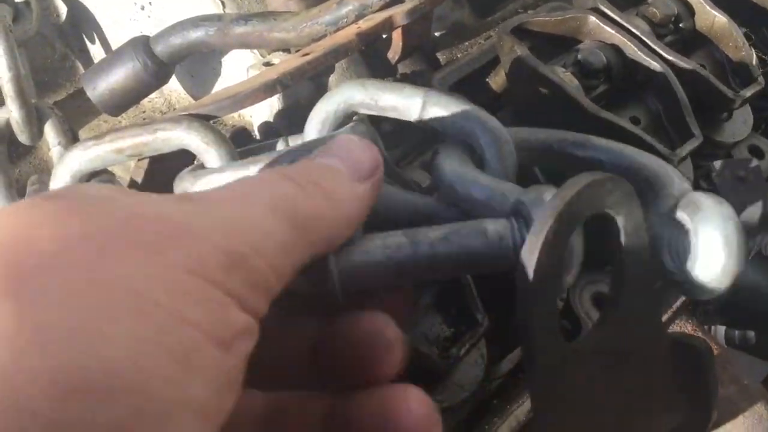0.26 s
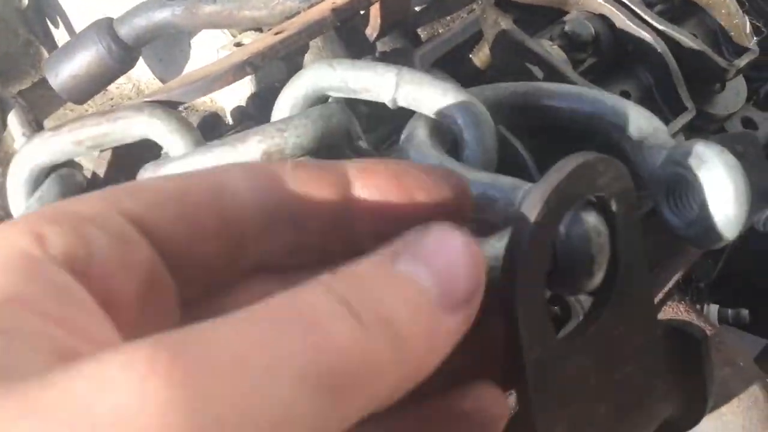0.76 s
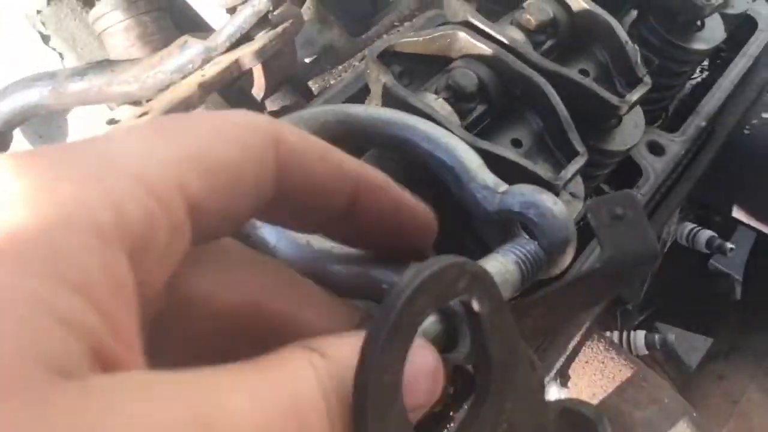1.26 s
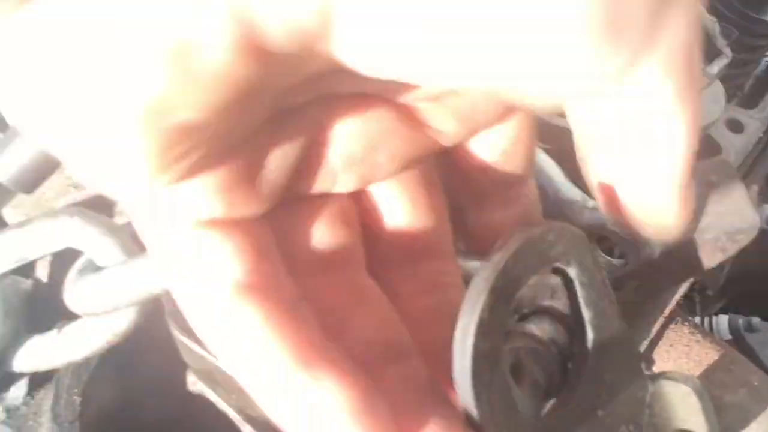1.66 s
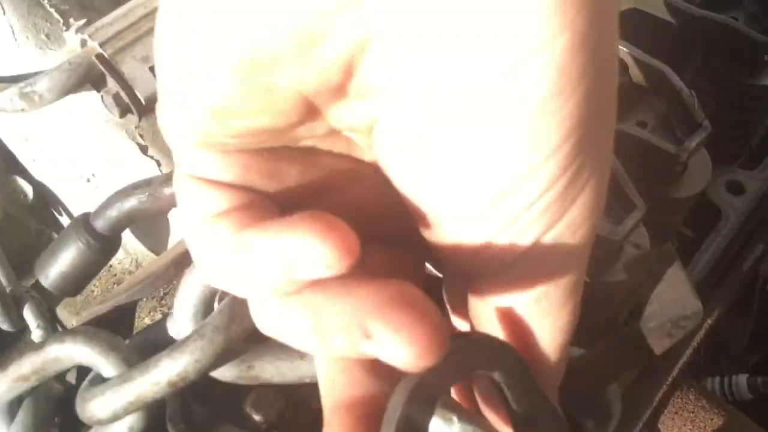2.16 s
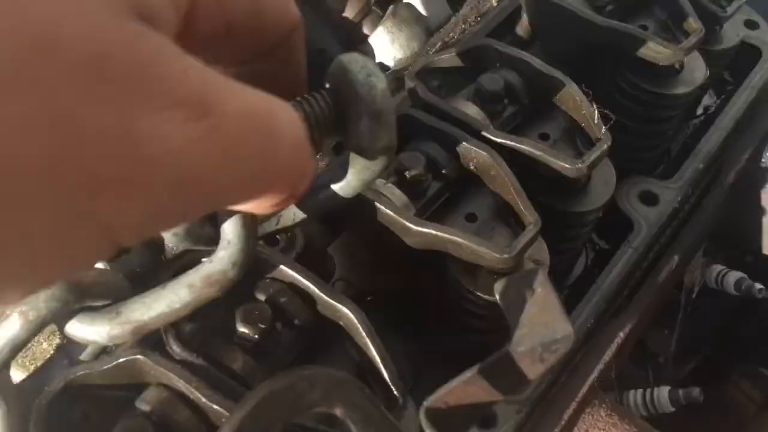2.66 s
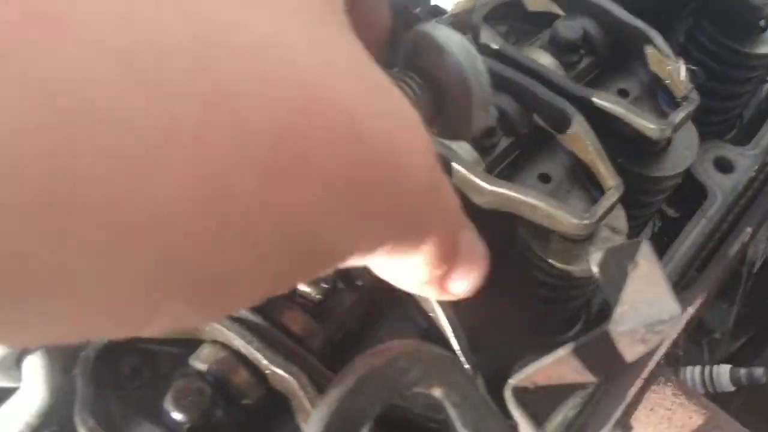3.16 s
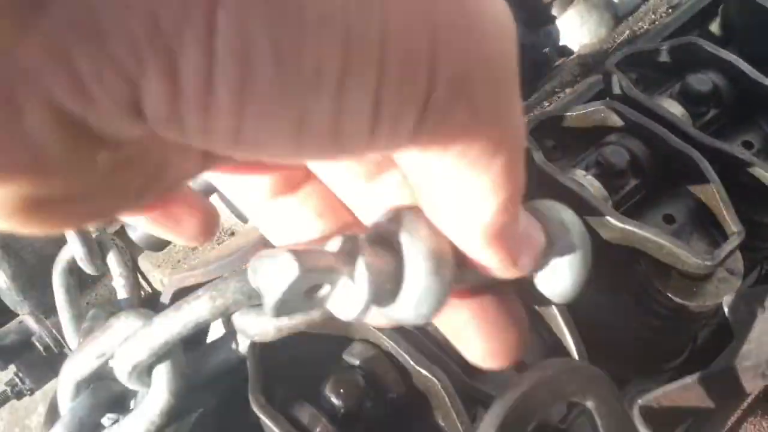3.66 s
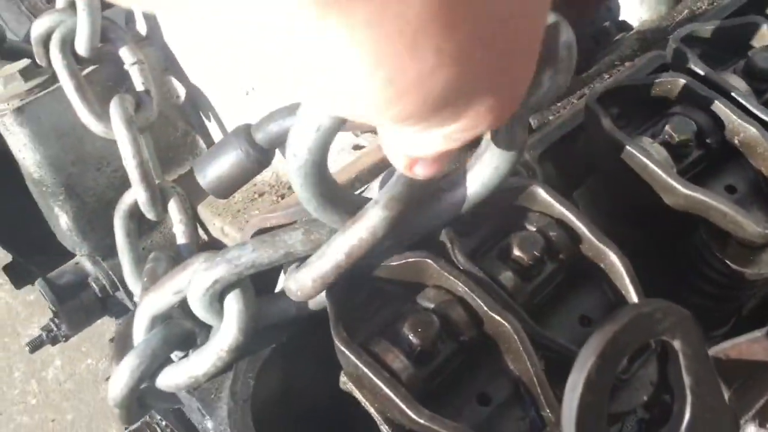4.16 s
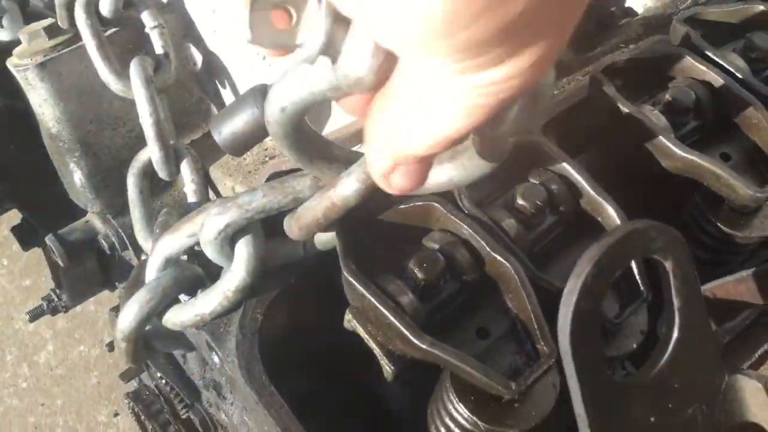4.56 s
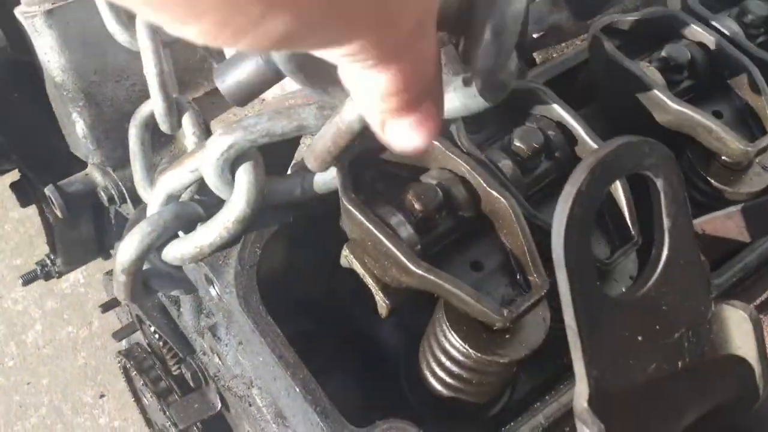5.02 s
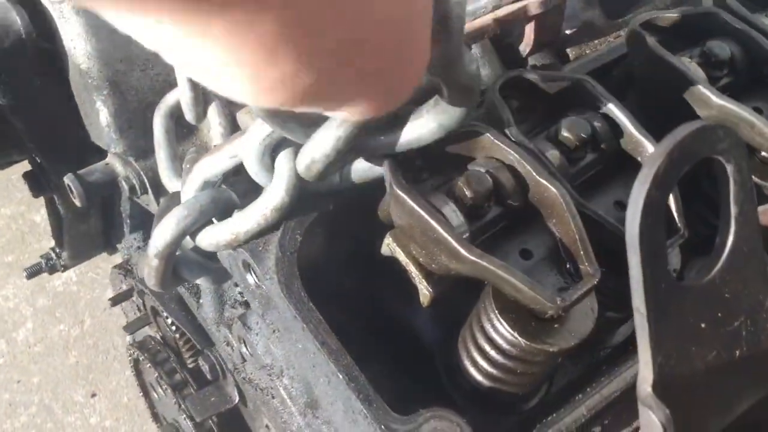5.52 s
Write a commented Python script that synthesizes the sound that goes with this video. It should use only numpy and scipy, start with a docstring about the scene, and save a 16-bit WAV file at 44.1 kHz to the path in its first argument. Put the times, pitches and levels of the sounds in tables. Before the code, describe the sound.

Dry, crisp steel contacts in uneven bursts: first dull clanks and scraping on a bracket, then a brief lull, a loud dense rattle of shackle and chain links, another bright clink, and sparser ticks and rubbing. Rings are short, choked by fingers. Close mono phone pickup over an open engine bay, with only a tiny metallic reflection and soft traffic hum that grows slightly late.

```python
"""Steel cracks and rings close to the phone: a hand works a shackle out of an engine's lifting bracket
and turns it among heavy chain links. Each contact is a noise crack plus decaying sines for bracket,
bow, pin and links; fingers damp the ring. Rough grit drives the scrapes of steel on steel between contacts.
The engine bay answers briefly and the block thuds faintly; distant traffic, filtered noise, drones outdoors."""
import sys
import numpy as np
from scipy import signal
from scipy.fft import rfft, irfft, next_fast_len
from scipy.io import wavfile
from scipy.ndimage import uniform_filter1d, minimum_filter1d, map_coordinates

SR = 44100
rng = np.random.default_rng(int(sys.argv[2]) if len(sys.argv) > 2 else 0)


def natural_amplitude(level_db):
    """Convert a level in decibels to a linear amplitude factor, elementwise."""
    exponent = np.asarray(level_db, float) / 20
    return 10 ** exponent


def generate_wav(signal):
    """Clip the signal to [-1, 1] and save it as 16-bit WAV at the path in sys.argv[1]."""
    frames = np.transpose(np.atleast_2d(signal))
    scaled = np.clip(frames, -1, 1) * 32767
    pcm = np.round(scaled).astype(np.int16)
    wavfile.write(sys.argv[1], SR, pcm)


N = 255318  # samples
UNHOOKED_S = 2.9  # the shackle leaves the bracket

# steel contacts, relative levels: start_s, clank_db, shackle_db, thin_links_db, top_links_db
CONTACTS = [(0.0144, -18.5, -17.5, -22.5, -29.5), (0.1585, -26.5, -31, -39.5, -30),
            (0.1692, -20.5, -23.5, -38, -40), (0.1813, -13.5, -10.5, -16.5, -12),
            (.201, -21.5, -15.5, -30.5, -36.5), (.226, -31.5, -40, -43.5, -33),
            (0.2628, -21, -17.5, -29, -38.5), (0.277, -14.5, -17, -13, -5),
            (0.333, -20, -22.5, -29.5, -26.5), (.337, -6, -14.5, -5.5, -19.5),
            (0.381, -25.5, -31.5, -36, -37.5), (0.4758, -38.5, -46.5, -63, -59),
            (0.6847, -17, -19, -26.5, -23.5), (0.705, -18.5, -12.5, -20, -14), (0.7163, -15, -18, -13, -22),
            (.751, -20, -23, -28, -45), (0.82, -22, -38, -42, -47), (0.8567, -25, -40, -43, -47),
            (0.896, -42.5, -55, -62, -56), (0.9925, -14, -16.5, -35, -42.5),
            (1.0184, -21.5, -29.5, -39, -50), (1.0313, -17.5, -16.5, -31.5, -44),
            (1.0716, -14, -20.5, -33, -27), (1.0778, -19, -12.5, -19.5, -26),
            (1.1252, -36.5, -25, -40.5, -41.5), (1.242, -12.5, -15, -5, -8.5), (1.2511, -15, -15, -26, -17),
            (1.3647, -25, -34.5, -46.5, -56), (1.511, -32, -35, -36, -47), (1.5302, -17, -19.5, -37, -26),
            (1.824, -39, -51, -60, -60), (1.8598, -17, -16.5, -11.5, -6.5), (1.876, -35, -57, -50, -49),
            (2.075, -17, -19.5, -31.5, -33), (2.0946, -17.5, -41, -37, -54), (2.1963, -26.5, -25, -29, -24),
            (2.2257, -19.5, -28, -53.5, -24.5), (2.2419, -33, -50, -30, -42), (2.292, -40, -56, -62, -62),
            (2.3892, -26, -43, -43, -54), (2.4071, -7.5, -7, -11, -30), (2.4422, -21.5, -39.5, -35, -47.5),
            (2.473, -36, -38, -46.5, -47), (2.5268, -26, -34, -30.5, -31.5), (2.553, -9.5, -16, -23, -33),
            (2.5853, -8, -14.5, -18, -15), (2.6151, -13, -22, -8.5, -13.5),
            (2.6616, -16, -18.5, -24, -20.5), (3.038, -23.5, -33, -36.5, -39.5),
            (3.0733, -32.5, -38.5, -52.5, -51), (3.0946, -17, -16, -16.5, -23.5),
            (3.105, -40, -19.5, -33, -25), (3.1225, -19, -22, -17, -11.5), (3.136, -35, -21.5, -35.5, -19),
            (3.244, -33, -34, -35, -43.5), (3.3012, -28, -39, -38, -44), (3.331, -31.5, -44.5, -42.5, -42),
            (3.3588, -17.5, -38, -32, -41), (3.3688, -14.5, -10.5, -15, -4.5),
            (3.389, -18, -25, -10.5, -22), (3.3987, -19, -17.5, -15, -16), (3.4166, -31, -11.5, -24, -32.5),
            (3.433, -6.5, 2, 1, -15.5), (3.445, -13.5, -11.5, -3.5, -19.5), (3.452, -28, -11, -12, -10.5),
            (3.469, -31.5, -17, -14, -8), (3.4808, -14.5, -23.5, -27, -20.5),
            (3.5103, -27, -28, -34, -47.5), (3.5161, -17, -28.5, -36.5, -23),
            (3.5626, -22, -22.5, -32, -33.5), (3.577, -19, -26.5, -33.5, -26.5),
            (3.7277, -30.5, -28, -37.5, -43), (3.84, -40, -59, -60, -58), (3.9229, -29, -39, -42.5, -33),
            (3.9342, -35, -32.5, -47.5, -44), (3.972, -31, -30, -28, -38), (4.0026, -28, -22, -33, -50),
            (4.0595, -17.5, -6, -21, -24), (4.1084, -22.5, -27.5, -23.5, -35.5),
            (4.1309, -28.5, -22.5, -19.5, -7), (4.161, -8, -4, -6.5, 0.5), (4.173, -34, -27.5, -18, -7.5),
            (4.18, -30, -46, -14.5, -15), (4.2213, -23.5, -40.5, -37.5, -55), (4.352, -52, -52, -52, -51.5),
            (4.408, -46.5, -69, -68, -63), (4.455, -54, -59, -55, -57), (4.531, -37.5, -63, -62, -62),
            (4.5605, -24.5, -58, -52, -27.5), (4.589, -37.5, -45, -48, -46),
            (4.6632, -35.5, -63, -47.5, -35), (4.7513, -24, -38, -44, -40.5),
            (4.7607, -30.5, -25, -39, -40), (4.827, -14.5, -38, -31, -32.5),
            (4.885, -23, -33.5, -28, -15.5), (4.9265, -25.5, -28, -27.5, -31), (4.9613, -29, -45, -49, -51),
            (4.977, -20.5, -32, -42, -42.5), (5, -19, -6, -13.5, -17), (5.0824, -19, -39, -40, -45.5),
            (5.145, -28.5, -58, -44, -60), (5.177, -39, -64, -61, -53), (5.2703, -21, -47, -40.5, -48),
            (5.2898, -9.5, -13.5, -8, -23), (5.3161, -14.5, -29, -16.5, -30), (5.3671, -18, -30, -19, -29),
            (5.4276, -30.5, -32.5, -29, -22), (5.4598, -28.5, -42.5, -46.5, -44.5),
            (5.552, -17.5, -22, -27, -33), (5.586, -22.5, -19, -24, -37.5), (5.623, -27.5, -48, -34.5, -39),
            (5.753, -28.5, -37.5, -48.5, -41)]
# the hand: time_s, bracket_gain_db, finger_damping_db_per_s, pin_over_bow_db
HAND = [(0, -3.5, 282.5, 8.5), (.7, 2.5, 286.5, 0.5), (1.1, -4, 284, -9.5), (1.6, -8, 301, -25),
        (1.85, -37, 700, -4.5), (2.1, 0, 330, 12), (2.4, -22.5, 501, 22.5), (2.7, -8.5, 491, 0.5),
        (3.3, -5, 148.5, -3.5), (3.46, -8, 166.5, -0.5), (3.9, -9.5, 138, -8.5), (4.7, -21.5, 302, 5),
        (5, -9.5, 278, 2.5), (5.3, -28, 200.5, -3), (5.8, -22, 300, -2.5)]
# blows on one mode's sweet spot that leave it singing: start_s, pitch_hz, level_db, t60_s
SINGING = [(.185, 4890, -20, .08), (.28, 13300, -35.5, .24), (.337, 12075, -6, .1),
           (.337, 10975, -11.5, .12), (.34, 2525, -21, .08), (.715, 7100, -9, .047), (.715, 4383, -27, .19),
           (.99, 985, -39, .33), (1.078, 10020, -19, .08), (1.245, 848, -49, .8), (1.245, 3607, -36, .2),
           (1.531, 3607, -25, .12), (1.531, 4925, -23, .08), (1.531, 1798, -24, .07),
           (1.858, 12600, -7, .035), (2.096, 1355, -38, .33), (2.197, 12520, -18, .076),
           (2.242, 10945, -29.5, .14), (3.0945, 10060, -24, .18), (3.44, 1400, -25.5, .08),
           (3.445, 13690, -17, .18), (3.566, 1405, -24, .06), (3.934, 4776, -24.5, .17),
           (3.934, 7250, -30, .28), (4.059, 15400, -28, .18), (4.165, 2610, -22, .07),
           (4.763, 5995, -26, .09), (4.83, 7282, -33, .13), (4.885, 7200, -24, .06),
           (5.006, 10970, -13, .077), (5.006, 13715, -16, .06), (5.29, 10975, -8, .1),
           (5.587, 6040, -28, .08)]
# strokes of steel along steel: middle_s, length_s, drag_db, grind_db, rub_db
STROKES = [(.19, 0.11, -46, -36.5, -50), (0.413, .2, -38, -43, -59.5), (0.548, 0.17, -63.5, -72, -65),
           (0.973, 0.14, -71, -73, -62), (1.179, .17, -35.5, -30.5, -49.5), (1.458, .12, -68, -67, -56.5),
           (1.532, 0.16, -48, -49, -52), (1.593, .1, -68, -54, -59), (1.765, 0.17, -64, -57, -52.5),
           (2.032, 0.099, -48.5, -70, -69), (2.15, .12, -63, -61, -64), (2.274, .1, -50.5, -69, -64),
           (2.496, 0.27, -67, -46.5, -50), (2.743, 0.053, -69, -58, -63), (2.915, 0.098, -55, -65, -59),
           (2.998, 0.092, -70, -74, -61), (3.181, 0.18, -60.5, -59, -58), (3.555, 0.16, -45.5, -50, -57),
           (3.723, 0.14, -60, -58, -55), (3.837, 0.15, -62.5, -69, -51), (3.979, 0.26, -46.5, -50, -45.5),
           (4.302, 0.067, -80, -72, -78), (4.461, 0.059, -57, -77, -67), (4.678, 0.29, -49.5, -56.5, -48.5),
           (5.172, 0.14, -65, -69, -58), (5.47, 0.38, -52.5, -52.5, -56)]
# slow creep of the hand between strokes, drag, grind, rub: level_db
CREEP_DB = [-83, -83.5, -78]

# modes of each steel part, relative levels: level_db, t60_s
BRACKET_MODES = [(-10.5, 0.13), (-8.5, 0.11), (-5.5, 0.025), (-13, 0.1), (7.5, 0.03), (0.5, 0.075),
                 (1.5, 0.032), (-3, 0.064), (-1, 0.067), (5, 0.027), (6.5, 0.02), (-6.5, 0.0078),
                 (-4, 0.047), (-6, 0.033), (-3, 0.084), (0, 0.05), (-10.5, 0.078)]
HOOKED_BOW_MODES = [(-26.5, 0.08), (-1, 0.075), (-6.5, .07), (-11.5, 0.099), (-12, 0.045)]
FREE_BOW_MODES = [(-11, 0.026), (5, 0.045), (-12, 0.037), (-7, 0.087), (-1, 0.097)]
PIN_MODES = [(-4, 0.069), (-2, 0.05)]
THIN_LINK_MODES = [(4, 0.071), (-20, 0.077), (4.5, 0.05), (-6.5, 0.074), (6, 0.033), (-12.5, 0.056),
                   (0, 0.091), (-29, .25), (-1.5, 0.07), (-9, .12)]
TOP_LINK_MODES = [(3.5, 0.038), (11, 0.056), (15.5, 0.041), (-11.5, .03), (-9.5, 0.054), (-11.5, 0.11),
                  (-20, .15)]
# pitches of those modes; bow and pin shift once off the bracket: pitch_hz
BRACKET_HZ = [1352, 1790, 2190, 2420, 2525, 2610, 2810, 3305, 3610, 3965, 4383, 5470, 7500, 8370, 8605,
              9005, 9370]
HOOKED_BOW_HZ = [2440, 4925, 4975, 7075, 7100]
FREE_BOW_HZ = [2610, 4756, 4805, 6910, 7282]
HOOKED_PIN_HZ = [5500, 5920]
FREE_PIN_HZ = [5990, 6050]
THIN_LINKS_HZ = [9995, 10060, 10365, 10975, 11468, 11610, 12075, 13300, 13690, 15395]
TOP_LINKS_HZ = [12456, 12600, 12678, 12840, 13100, 13690, 15395]

# spectrum of the contact crack: frequency_hz, level_db
CRACK = [(400, -40.5), (800, -12.5), (1500, -5), (3000, -1), (5500, 1.5), (8000, -5.5), (11000, -35.5),
         (16000, -39.5)]
# spectrum of link snapping on link: frequency_hz, level_db
SNAP = [(6000, -32), (9000, -2.5), (12000, -8.5), (14500, -4), (16500, -40.5)]
# spectrum of the dull drag over the bracket: frequency_hz, level_db
DRAG = [(700, -26), (1500, 0.5), (2800, 8), (4500, -7.5), (8000, -25.5)]
# spectrum of the shackle's grind: frequency_hz, level_db
GRIND = [(3000, -18), (5000, 5.5), (8500, -12), (11000, -25)]
# spectrum of the rub among the links: frequency_hz, level_db
RUB = [(5000, -39), (9000, -30), (12500, 10.5), (14000, -5), (16000, -4.5)]

# decay of the engine bay: frequency_hz, t60_s
BAY = [(500, 0.29), (3000, 0.075), (12000, 0.0077)]
# course of the distant traffic, relative levels: time_s, drone_db, road_rush_db
TRAFFIC = [(0, -58, -57.5), (1.2, -58, -59), (2.4, -57.5, -52.5), (3, -68.5, -55), (3.65, -52.5, -52),
           (4, -50, -53), (4.56, -45, -52), (5.17, -45, -52.5), (5.5, -58, -48), (5.8, -45.5, -50)]
# spectrum of the traffic drone: frequency_hz, level_db
DRONE = [(88, -52), (150, -23.5), (189, 0.5), (231, -4), (264, -1.5), (349, -10), (400, -37.5),
         (520, -64.5), (880, -120)]
# spectrum of the traffic rumble: frequency_hz, level_db
RUMBLE = [(25, -48.5), (60, -21), (95, 2), (140, -3.5), (200, -28.5), (500, -90.5)]
# spectrum of the road rush: frequency_hz, level_db
ROAD = [(100, -33.5), (160, -10.5), (260, -3), (400, -10), (575, -14), (800, -12.5), (1100, -10.5),
        (1500, -15), (2050, -21), (3000, -35), (4500, -55.5), (8000, -69.5), (16000, -76.5)]


def contacts():
    """Every contact cracks and rings each part; where it lands sets how strongly each mode speaks."""
    t = np.arange(SR // 4) / SR
    hooked, free = steel_parts(True, t), steel_parts(False, t)
    sizes = [len(part) for part in free]
    rows = np.vstack([CONTACTS, ticks()])
    landing = rng.standard_normal((len(rows), sum(sizes)))
    chatter = rng.random((len(rows), 5, 2)) * [0.008, 0.35]  # delay in s, relative size
    rise = 1 - np.exp(-t / 0.00015)
    # a sharp crack with a weaker, longer rattle of the settling surfaces
    crack = rise * (natural_amplitude(5 - 60 * t / 0.0099) + natural_amplitude(-6.5 - 60 * t / 0.017))
    snap = rise * natural_amplitude(-5 - 60 * t / 0.013)
    ring, crack_envelope, snap_envelope = np.zeros((3, N + SR))

    for (start_s, clank_db, shackle_db, *links_db), spread, bounces in zip(rows, landing, chatter):
        bracket, bow, pin, *links = hooked if start_s < UNHOOKED_S else free
        if start_s < UNHOOKED_S:
            pin = pin * natural_amplitude(-900 * t)  # the pin is all but dead while it sits in the bracket
        tilt_db = column(HAND, 3, start_s)
        bow_db = shackle_db - max(tilt_db, 0)
        pin_db = shackle_db + min(tilt_db, 0)
        bracket_db = clank_db + column(HAND, 1, start_s)
        part_db = np.repeat([bracket_db, bow_db, pin_db, *links_db], sizes)
        gains = natural_amplitude(part_db + 3.98 * spread)

        # the bolted bracket rings on; fingers damp what the hand holds
        fingers = natural_amplitude(0.5 - column(HAND, 2, start_s) * t)
        held = gains[sizes[0]:] @ np.vstack([bow, pin, *links]) * fingers
        note = rise * (gains[:sizes[0]] @ bracket + held)
        snap_size = np.linalg.norm(natural_amplitude(np.array(links_db)))

        # rough faces meet several times within a few ms
        for delay_s, size in [(0, 1), *bounces]:
            at = round((start_s + delay_s) * SR)
            ring[at:][:len(t)] += size * note
            crack_envelope[at:][:len(t)] += size * natural_amplitude(clank_db) * crack
            snap_envelope[at:][:len(t)] += size * snap_size * snap
    return ring[:N] + coloured_burst(crack_envelope[:N], CRACK) + coloured_burst(snap_envelope[:N], SNAP)


def steel_parts(hooked, t):
    """The decaying modes of bracket, bow, pin and the two kinds of link."""
    if hooked:
        bow = rings(HOOKED_BOW_HZ, HOOKED_BOW_MODES, t)
        pin = rings(HOOKED_PIN_HZ, PIN_MODES, t)
    else:
        bow = rings(FREE_BOW_HZ, FREE_BOW_MODES, t)
        pin = rings(FREE_PIN_HZ, PIN_MODES, t)
    thin_links = rings(THIN_LINKS_HZ, THIN_LINK_MODES, t)
    top_links = rings(TOP_LINKS_HZ, TOP_LINK_MODES, t)
    return [rings(BRACKET_HZ, BRACKET_MODES, t), bow, pin, thin_links, top_links]


def rings(hz, modes, t):
    """One decaying sine per mode; the squares of their starting amplitudes sum to 1."""
    db, t60 = np.transpose(modes)[:, :, None]
    sines = np.sin(2 * np.pi * np.array(hz)[:, None] * t)
    return natural_amplitude(db - 60 * t / t60) * sines / np.linalg.norm(natural_amplitude(db))


def ticks():
    """Stray small contacts, as strong as the stroke that causes them."""
    luck = rng.random((int(12 * N / SR), 5))  # 12 a second
    start = luck[:, 0] * N
    drag, grind, rub = 20 * np.log10(strokes()[:, start.astype(int)] + 1e-6)
    gain_db = [7.6, 3, 3, 3]  # clank, shackle, thin links, top links
    spread_db = 7 * (2 * luck[:, 1:] - 1)
    db = np.transpose([drag, grind, rub, rub]) + gain_db + spread_db
    return np.column_stack([start / SR, db])


def singing():
    """Single modes that swell within about a millisecond and outlast the blow."""
    out, t = np.zeros(N + SR), np.arange(SR // 2) / SR
    for start_s, hz, db, t60 in SINGING:
        envelope = natural_amplitude(db - 60 * t / t60) * (1 - np.exp(-t / 0.00033))
        out[round(start_s * SR):][:len(t)] += envelope * np.sin(2 * np.pi * hz * t)
    return out[:N]


def sliding():
    """Steel drags over the bracket, the shackle grinds, the links rub together; pressure flutters."""
    t, short = np.arange(N) / SR, np.arange(SR // 6) / SR
    hooked, free = steel_parts(True, short), steel_parts(False, short)
    drag = scrape(hooked[:1], DRAG, ring_db=6, rate=2000)
    on_bracket = scrape(hooked[:2], GRIND, ring_db=5, rate=2000)
    in_hand = scrape(free[1:3], GRIND, ring_db=3, rate=3000)
    grind = np.where(t < UNHOOKED_S, on_bracket, in_hand)
    rub = scrape(free[3:], RUB, ring_db=-0.5, rate=2600)

    pressure = strokes() + settling() + natural_amplitude(np.c_[CREEP_DB])  # the hand never quite stops
    shared_flutter_db = 1.4 * wobble(40)
    out = np.zeros(N)
    for level, part in zip(pressure, (drag, grind, rub)):
        out += level * natural_amplitude(shared_flutter_db + 2.9 * wobble(18)) * part
    return out


def scrape(parts, spectrum, ring_db, rate):
    """Grit heard directly and through the parts' modes, which come and go as the contact point travels."""
    push = grit(rate, spread_db=2.5)
    modes = np.vstack(parts)
    ring = np.zeros(N)
    for k in range(6):
        group = modes[k::6].sum(axis=0)
        ring += natural_amplitude(6.4 * wobble(7)) * signal.oaconvolve(push, group)[:N]
    return unit(coloured(push, spectrum) + natural_amplitude(ring_db) * unit(ring))


def grit(rate, spread_db):
    """Tiny catches of rough steel, on average rate a second, of very uneven size."""
    catches = rng.random(N) < rate / SR
    return catches * rng.standard_normal(N) * natural_amplitude(spread_db * rng.exponential(size=N))


def strokes():
    """Amplitude of drag, grind and rub under each smooth stroke."""
    t = np.arange(N) / SR
    out = np.zeros((3, N))
    for middle_s, length_s, *db in STROKES:
        swell = np.cos(np.pi * np.clip((t - middle_s) / length_s, -0.5, 0.5)) ** 2
        out += natural_amplitude(np.array(db))[:, None] * swell
    return out


def settling():
    """Surfaces slide into each contact and settle after it: a short lead-in, a dying tail."""
    # drag, grind, rub; the last of the settling lingers and dies slowly
    settle_db, settle_t60_s, linger_db = [-28.5, -29, -37.5], [0.19, 0.18, 0.2], [-23, -22, -21]
    start_s, clank_db, shackle_db, *links_db = np.transpose(CONTACTS)
    contact_db = np.array([clank_db, shackle_db, np.max(links_db, axis=0)]) + np.c_[settle_db]
    lag = np.arange(-(SR // 8), SR // 2) / SR
    lead_in = np.exp(lag / 0.014)
    out = []
    for db, t60, slow_db in zip(contact_db, settle_t60_s, linger_db):
        blow_power = np.bincount(np.round(start_s * SR).astype(int), natural_amplitude(2 * db), N)
        tail = natural_amplitude(-60 * lag / t60) + natural_amplitude(slow_db - 60 * lag / 0.5)
        shape = np.where(lag < 0, lead_in, tail) ** 2
        power = signal.fftconvolve(blow_power, shape)[SR // 8:][:N]
        out.append(np.sqrt(np.abs(power)))
    return np.array(out)


def bay(x):
    """The engine bay's short answer: x through a decaying noise tail, treble dying first."""
    hz, t, z = signal.stft(rng.standard_normal(SR // 4), SR, nperseg=256)
    decay = natural_amplitude(-60 * t / along(BAY, hz)[:, None])
    tail = signal.istft(z * decay, SR, nperseg=256)[1]
    delayed = np.pad(x, (150, 0))  # 3.4 ms
    return signal.fftconvolve(delayed, tail / np.linalg.norm(tail))[:N]


def block():
    """Blows on the bracket pass into the engine block as a faint dull thud."""
    blows, t = np.zeros(N), np.arange(SR // 10) / SR
    for start_s, clank_db, *_ in CONTACTS:
        blows[round(start_s * SR)] = natural_amplitude(clank_db - 29) * (start_s < UNHOOKED_S)
    thud = natural_amplitude(-60 * t / 0.038) * np.sin(2 * np.pi * 260 * t)
    thud += 0.5 * natural_amplitude(-60 * t / 0.04) * np.sin(2 * np.pi * 520 * t)
    return highpass(signal.fftconvolve(blows, thud)[:N], 2, 110)


def traffic():
    """A wavering low drone and a rumble that swells a little with it, under a smooth road rush."""
    t = np.arange(N) / SR
    drone_db = column(TRAFFIC, 1, t)
    rumble_db = 0.26 * drone_db - 49
    road_db = column(TRAFFIC, 2, t) + 3.5
    drone = natural_amplitude(drone_db + 1.5 * wobble(9.8)) * coloured(rng.standard_normal(N), DRONE)
    rumble = natural_amplitude(rumble_db + 0.89 * wobble(4.9)) * coloured(rng.standard_normal(N), RUMBLE)
    road = natural_amplitude(road_db + 1.2 * wobble(5.05)) * coloured(rng.standard_normal(N), ROAD)
    return drone + rumble + road


def unit(x):
    """Scales to rms 1."""
    return x / np.sqrt(np.mean(x ** 2) + 1e-20)


def column(rows, k, at):
    """Column k of a table, read at the given times."""
    return np.interp(at, np.array(rows)[:, 0], np.array(rows)[:, k])


def wobble(rate):
    """A smooth random curve, rate knots a second."""
    knots = rng.standard_normal(int(N * rate / SR) + 4)
    return map_coordinates(knots, [np.arange(N) * rate / SR])


def along(points, hz):
    """Reads (Hz, value) points on a log frequency axis."""
    f, v = np.transpose(points)
    return np.interp(np.log(hz + 1), np.log(f + 1), v)


def shaped(x, spectrum):
    """Filters x by a (Hz, dB) spectrum."""
    m = next_fast_len(N + SR // 2)
    response = natural_amplitude(along(spectrum, np.fft.rfftfreq(m, 1 / SR)))
    return irfft(rfft(x, m) * response, m)[:N]


def coloured(x, spectrum):
    """Filters x by a (Hz, dB) spectrum and scales it to rms 1."""
    return unit(shaped(x, spectrum))


def coloured_burst(envelope, spectrum):
    """Noise under an envelope, then through a (Hz, dB) spectrum."""
    return shaped(envelope * rng.standard_normal(N), spectrum)


def highpass(x, order, hz):
    """Butterworth filter that removes what lies below hz."""
    return signal.sosfilt(signal.butter(order, hz, "high", fs=SR, output="sos"), x)


def scene():
    """Steel close by in the engine bay, traffic far behind."""
    steel = highpass(contacts() + singing() + sliding(), 4, 550)  # small parts radiate no bass
    return (steel + natural_amplitude(-12) * bay(steel) + block() + traffic())[None]


def roll_off(x):
    """The treble ends steeply here."""
    return signal.sosfilt(signal.butter(12, 16810, fs=SR, output="sos"), x)


def record(dry):
    """The phone's microphone drops the deepest bass and top treble; a fast limiter holds peaks at full scale."""
    dry = highpass(dry, 4, 45)
    dry = signal.sosfilt(signal.cheby2(10, 25, 16500, fs=SR, output="sos"), dry)
    need = np.minimum(1, 1 / (np.abs(dry) + 1e-9))
    gain = uniform_filter1d(minimum_filter1d(need, size=129), size=65)  # about 3 ms, then 1.5 ms
    return roll_off(dry * gain)


dry = scene()
out = record(dry)
generate_wav(out)
```